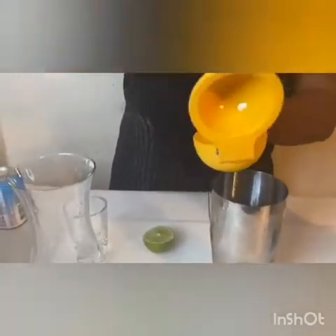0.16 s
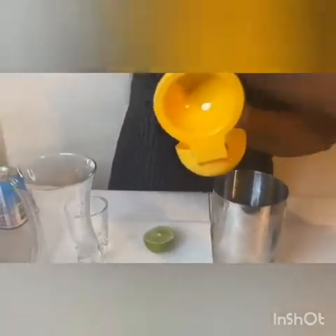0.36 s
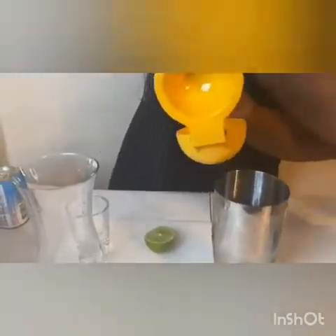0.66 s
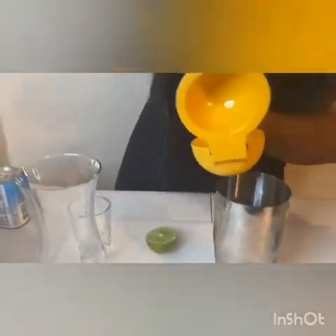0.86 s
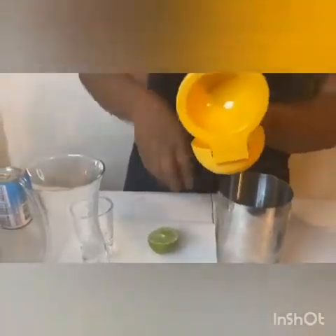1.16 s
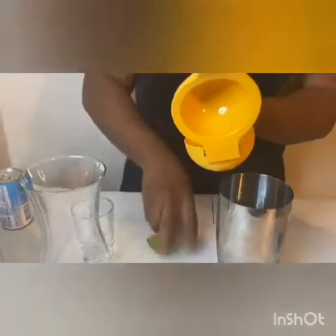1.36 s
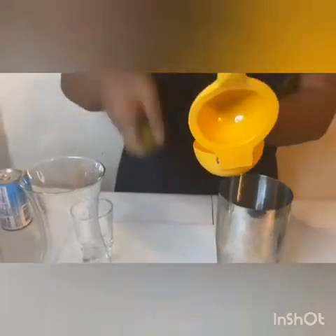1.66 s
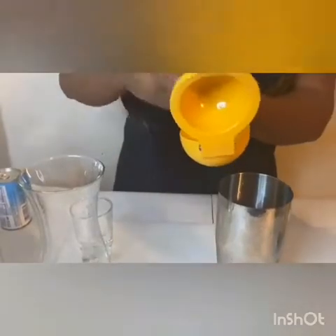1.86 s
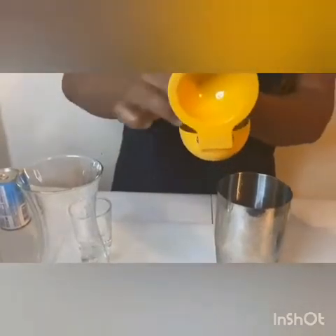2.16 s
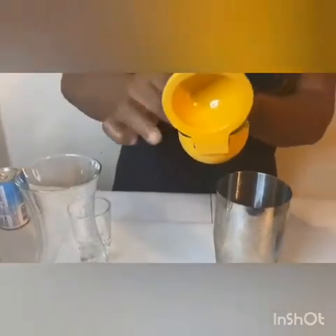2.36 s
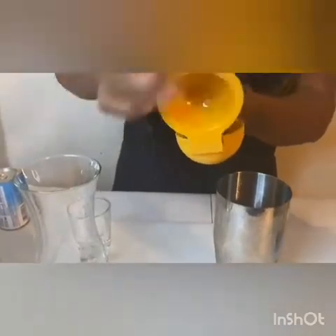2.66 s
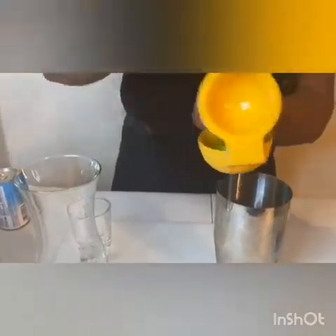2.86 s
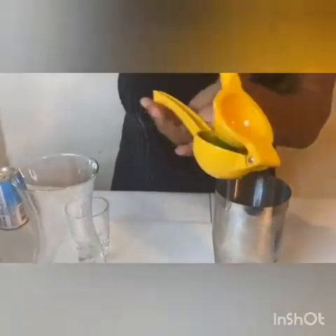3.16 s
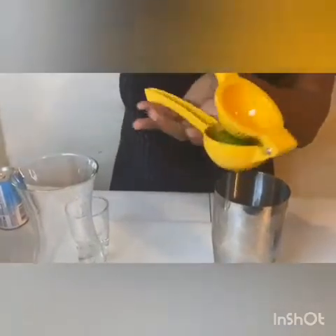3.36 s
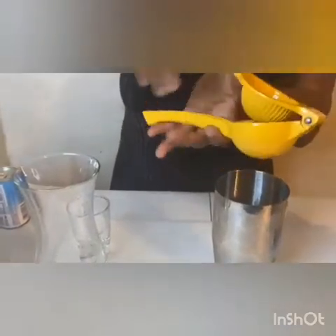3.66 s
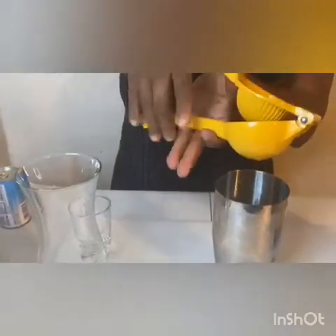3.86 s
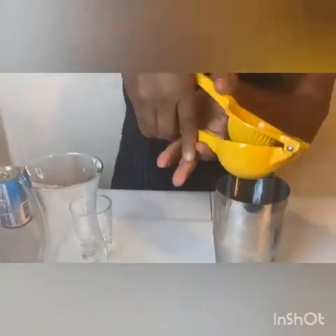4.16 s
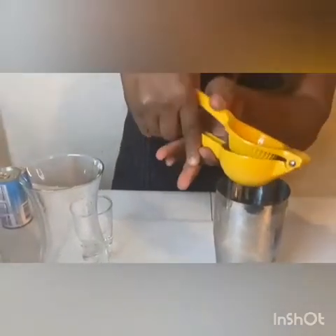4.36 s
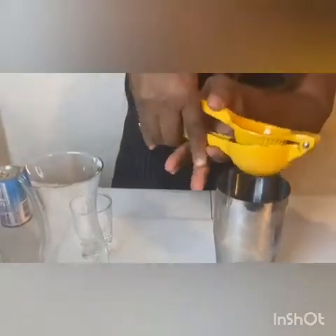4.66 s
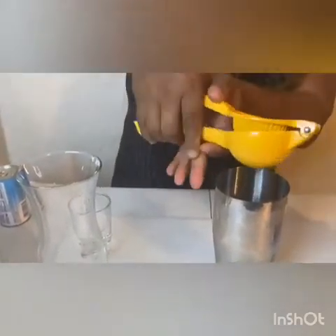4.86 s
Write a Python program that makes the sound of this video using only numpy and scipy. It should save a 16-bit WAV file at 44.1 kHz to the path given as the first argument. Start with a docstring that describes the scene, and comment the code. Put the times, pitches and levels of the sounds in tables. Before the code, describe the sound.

In a small kitchen, soft cloth rustle leads to a loud, low, hollow thump on the counter with a brief rattle. A metal citrus squeezer clacks sharply, a hand brushes a board, then light ticks and clicks follow as half a lime goes in. The hinge creaks and the lime faintly crackles as it is squeezed. Close microphone, low wavering drone and short room reflections.

```python
"""In a small kitchen, a hinged metal citrus squeezer is handled over a steel shaker.
The counter, bumped, booms as a hollow resonator under a dull knock and a rattle. The squeezer's halves clack
and tick as damped modes struck by brief contacts as half a lime goes in; hinge, palm and rind rub by stick-slip,
and the lime crackles as it is crushed. A hand brushes a board and clothes rustle: shaped noise. A low
appliance drone wavers below, with a faint hum and room air; close walls add dense reflections."""
import sys
import numpy as np
from scipy import signal
from scipy.fft import rfft, irfft, next_fast_len
from scipy.io import wavfile

SR = 44100
rng = np.random.default_rng(int(sys.argv[2]) if len(sys.argv) > 2 else 0)


def to_wav(sig):
    """Store sig (one row per channel, or 1-D mono) as 16-bit WAV at the path in sys.argv[1].

    Samples outside -1..1 are clipped; the rate is SR.
    """
    pcm = np.clip(np.atleast_2d(sig), -1, 1) * 32767
    pcm = np.round(pcm).astype(np.int16)
    wavfile.write(sys.argv[1], SR, pcm.T)  # frames by channels


N = 221765
TIME = np.arange(N) / SR
RING_TIME = TIME[:SR // 2]

# metal touching metal: (time [s], level [dB], brightness [dB per octave], ring pitch [Hz],
# contact chatter [s], {part near the blow: extra level [dB]})
TOUCHES = [(.564, -70, -4, 1940, 0.0026, {"cup": 0}),
           (1.104, -44.5, 1.5, 1750, 0.001, {"handle": 3, "cup": 5, "body": 5.5, "ring": 9, "lip": 4.3, "rim": 3.9, "tip": 2.7}),
           (1.1115, -53.5, -6, 1740, 0.00059, {"cup": -5.5, "ring": 4.2, "lip": 2.3}),
           (1.1448, -50, 0.5, 1874, 0.006, {"cup": -1.5, "body": 8.1, "ring": -1.8, "lip": 2.8}),
           (2.1859, -72, 3.5, 2070, 0.0035, {"cup": 3}),
           (2.1997, -69.5, -1, 2250, 0.0085, {"body": 9.6, "ring": 7}),
           (2.2655, -60, 3.5, 1930, 0.0079, {"handle": 13, "body": 2, "ring": 7.9, "rim": 9.7, "tip": -15}),
           (2.2835, -53.5, 2.5, 1886, 0.0018, {"handle": 11.6, "cup": 2.6, "body": 1.8, "ring": 3.3, "rim": 3.6, "tick": 4.8, "tip": -17}),
           (2.2885, -65, -1, 1830, 0.003, {"cup": 6.9, "body": 2, "tick": 23.7, "tip": -13}),
           (2.3737, -63, 0.5, 1905, 0.0027, {"cup": -10.5, "body": -7, "ring": 6.6, "lip": -2, "edge": 3.9, "rim": 9, "tick": -11, "tip": -12}),
           (2.7422, -53, -0.5, 1945, 0.00089, {"cup": -2, "ring": 7.6, "lip": -1, "rim": 3.9, "tip": 7.8}),
           (2.7475, -60.5, -1, 1880, 0.001, {"body": 9.3}),
           (2.8025, -72, -3, 2030, 0.003, {"body": 12, "ring": 9.4}),
           (2.8205, -73.5, 2, 1950, 0.00081, {"ring": 9.4, "rim": 5.9}),
           (2.8255, -71, -0.5, 1667, 0.00039, {"cup": -15, "body": 8.2, "ring": 11}),
           (2.8632, -73.5, -6.5, 1920, 0.0028, {"cup": -10, "ring": 7.5}),
           (2.9718, -47.5, -1, 1771, 0.0014, {"cup": -4.5, "ring": 10.4, "lip": 7.4, "edge": 1.4, "tick": -20, "tip": 12.8}),
           (3.1536, -59, 6, 1822, 0.0014, {"ring": 11.6, "lip": -5, "edge": -4.5, "tick": 6.1, "tip": 1.3}),
           (3.374, -75.5, 5.5, 1885, 0.0014, {"ring": 12.7, "lip": -21, "edge": -7.5, "tick": 4.9}),
           (3.777, -85, 0.5, 1875, 0.0015, {"ring": 15, "edge": 11.6}),
           (4.073, -82.5, -6, 2000, 0.0022, {"lip": 17, "edge": 4.9}),
           (4.259, -56.5, 0.5, 2023, 0.0019, {"cup": 2.6, "ring": 11.8, "lip": 11, "edge": 18.3, "rim": 1, "tick": 5, "tip": 15}),
           (4.3336, -69, 5, 1970, 0.0083, {"body": 15.6}),
           (4.4846, -56.5, 0.5, 2090, 0.0028, {"cup": 13.5, "body": 2.4, "ring": 2.2}),
           (4.6895, -78, -1, 1990, 0.0019, {"lip": 21, "edge": 5.3, "rim": 5.6})]

RUB_ATTACK_S, RUB_T60_S = 0.019, 0.32   # every stroke of hinge, rind and pulp


def from_db(db):
    """Logarithmic level: decibels to amplitude gain."""
    return 10 ** (np.asarray(db) / 20)


def rms_one(x):
    """Power normalisation: scale to unit rms."""
    return x / np.sqrt(np.mean(x ** 2) + 1e-20)


def strike_one(x):
    """Energy normalisation: scale a hit to the energy of 10 ms at unit rms."""
    return x / np.sqrt(np.sum(x ** 2) / (SR / 100) + 1e-20)


def in_time(rows):
    """Linear interpolation: one curve in time for each column of a table."""
    s, *columns = np.transpose(rows)
    return [np.interp(TIME, s, c) for c in columns]


def at_hz(points, size):
    """Spectral interpolation: a table read at the bins of a transform, on a log-frequency axis."""
    hz, value = np.transpose(points)
    return np.interp(np.log(np.fft.rfftfreq(size, 1 / SR) + 1), np.log(hz), value)


def colour(x, spectrum):
    """Linear filtering: weight the transform of a noise by a spectrum."""
    size = next_fast_len(x.shape[-1])
    shaped = irfft(rfft(x, size) * from_db(at_hz(spectrum, size)), size)
    return shaped[..., :x.shape[-1]]


def diffuse(spectrum, size):
    """Diffuse field: stereo noise whose left-right correlation depends on frequency."""
    # likeness of the two sides: (frequency [Hz], correlation [1])
    likeness = [(50, 1), (150, 0.92), (300, 0.77), (600, 0.4), (1200, 0), (2000, 0.27), (3200, 1),
                (5000, 0.73), (7500, -0.029)]
    padded = next_fast_len(size)
    mid, side = rfft(rng.standard_normal((2, padded)))
    alike = np.clip(at_hz(likeness, padded), -1, 1)
    pair = np.sqrt(1 + alike) * mid + np.sqrt(1 - alike) * side * [[1], [-1]]
    return rms_one(irfft(pair * from_db(at_hz(spectrum, padded)), padded)[:, :size])


def drift(hz):
    """Low-pass random process: noise below a cutoff [Hz], with unit rms."""
    slow = signal.sosfilt(signal.butter(2, hz, fs=SR, output="sos"), rng.standard_normal(N + SR))
    return rms_one(slow[SR:])   # the filter has settled after one second


def fade(t60):
    """Exponential damping: decay by 60 dB in t60 [s]."""
    return np.exp(-np.log(1000) * RING_TIME / max(t60, 1e-4))


def ring(modes, spread_db, detune=0):
    """Modal superposition: damped sines whose strength and pitch vary with the blow and the grip."""
    chance = rng.standard_normal((len(modes), 2))
    total = 0
    for k, ((hz, db, t60), (stronger, higher)) in enumerate(zip(modes, chance)):
        gain = (-1) ** k * from_db(db + spread_db * stronger)
        total = total + gain * fade(t60) * np.sin(2 * np.pi * hz * (1 + detune * higher) * RING_TIME)
    return total


def band(x, modes, margin):
    """Band-pass filtering: keep the range of a family of modes, widened by a frequency ratio."""
    low = modes[0][0] / max(margin, 1)
    high = min(modes[-1][0] * max(margin, 1), SR / 2 - 1000)
    return signal.sosfilt(signal.butter(3, [low, high], "band", fs=SR, output="sos"), x + 1e-18)


def add(track, s, sound):
    """Superposition: mix a sound in at a time [s]."""
    start = round(s * SR)
    track[start:start + len(sound)] += sound[:N - start]


def slips(per_s, grain_db, uneven_db, uneven_hz=35):
    """Stick-slip friction: random clicks of either sign whose sizes also drift together."""
    sizes = from_db(grain_db * np.minimum(rng.exponential(1, N), 4) + uneven_db * drift(uneven_hz))
    return (rng.random(N) < per_s / SR) * rng.choice([-1, 1], N) * sizes


def resonate(x, hz, width_hz):
    """Heterodyning: a resonance with a movable centre; shift down, smooth, shift back."""
    turn = np.exp(2j * np.pi * np.cumsum(hz * np.ones(N)) / SR)
    smooth = signal.sosfilt(signal.butter(2, width_hz / 2, fs=SR, output="sos"), x / turn + 1e-18)
    return rms_one(np.real(turn * smooth))


def strokes(rows, attack_s, t60):
    """Amplitude envelope: each movement swells exponentially, holds for its length and dies away."""
    gain = np.zeros(N)
    for s, length, db in rows:
        rise = np.exp(np.minimum(TIME - s, 0) / max(attack_s, .01))
        fall = np.exp(-np.log(1000) * np.maximum(TIME - s - length, 0) / max(t60, .06))
        gain = np.maximum(gain, from_db(db) * rise * fall)
    return gain


def two_tone(rows, main, second, attack_s, t60):
    """Parallel resonances: strokes stir two; the last column sets the second against the first."""
    main_rows = [(s, length, db) for s, length, db, _ in rows]
    second_rows = [(s, length, db + rel_db) for s, length, db, rel_db in rows]
    return main * strokes(main_rows, attack_s, t60) + second * strokes(second_rows, attack_s, t60)


def flurries(rows, grains, t60):
    """Damped excitation: each row (time [s], level [dB]) lets loose a dying run of grains."""
    out = np.zeros(N)
    for s, db in rows:
        run = np.roll(grains, -round(s * SR))[:len(RING_TIME)]
        add(out, s, from_db(db) * strike_one(run * fade(t60)))
    return out


def clacks(crack_lengths=8.5, chatter=0.066, shorter_per_octave=0.5):
    """Impact excitation: a click with chatter drives the modes, with a noisy crack, most where struck."""
    # the squeezer's modes, damped by the hands: {family: (frequency [Hz], level [dB], t60 [s])}
    squeezer_modes = { "handle": [(342, -6, 0.03), (400, -6, 0.033), (445.3, 1, 0.089)],
                      "cup": [(620, -17, 0.025), (695, 0, 0.1), (740, -14, 0.03)],
                      "body": [(1056, -5.5, 0.022), (1260, -2.5, 0.0082), (1470, -0.5, 0.02),
                      (1524, -5.5, 0.019)], "ring": [(1680, -8, 0.018), (1885, 2.5, 0.019),
                      (2028, -8.5, 0.037), (2144, -5.5, 0.0072)], "lip": [(2268, 3.5, 0.023),
                      (2586, -5.5, 0.039), (2744, -0.5, 0.018)], "edge": [(2940, 0.5, 0.05),
                      (3174, -2.5, 0.047), (3297, -4, 0.029), (3470, 4, 0.055)],
                      "rim": [(4300, -3.5, 0.036), (4800, 4, 0.024), (5070, -5, 0.047), (5310, -4, 0.036),
                      (5220, -4.5, 0.056)], "tick": [(5970, -1, 0.022), (6460, -2.5, 0.04),
                      (6700, -2, 0.029), (6760, -6.5, .04)], "tip": [(7330, 4.5, 0.02), (7610, -7.5, 0.058),
                      (8300, -14.5, 0.005), (10900, -5.5, 0.031)]}
    # how strongly each part answers any touch: {family: level [dB]}
    part_db = {"handle": -12.5, "cup": 2, "body": -4, "ring": 1.5, "lip": -7, "edge": -3, "rim": -11.5,
               "tick": -19.5, "tip": -29.5}
    # the noisy crack against each family's tone: {family: level [dB]}
    crack_db = {"handle": -3.5, "cup": -4, "body": 0.5, "ring": -8, "lip": -1.5, "edge": -1.5, "rim": -1,
                "tick": -0.5, "tip": -7}
    # modes that sing on when the open half hangs free: (frequency [Hz], level re blow [dB], t60 [s])
    sing_modes = [(1740, -13, .22), (1890, -16, .42), (1980, -15, .28)]
    ring_hz = 1885   # the ring family's usual pitch; the grip shifts it
    free_from_s, free_until_s = 2.9, 3.5   # the open half hangs free
    out, singing = np.zeros((2, N))
    for s, level_db, bright_db, pitch_hz, chatter_s, struck_db in TOUCHES:
        contact = chatter * rng.standard_normal(1024) * np.exp(-TIME[:1024] / max(chatter_s, 1e-4))
        contact[0] += 1
        for family, modes in squeezer_modes.items():
            octaves = np.mean([np.log2(hz / ring_hz) for hz, _, _ in modes])
            db = level_db + part_db[family] + bright_db * octaves + struck_db.get(family, 0)
            if family == "ring":
                modes = [(hz * pitch_hz / ring_hz, level, t60) for hz, level, t60 in modes]
            # brief contacts and high parts crack briefly
            crack_t60 = crack_lengths * chatter_s / 2 ** (shorter_per_octave * octaves)
            burst = rng.standard_normal(len(RING_TIME)) * fade(crack_t60)
            crack_modes = [m for m in modes if m[0] < 8000]   # Hz
            crack = from_db(crack_db[family]) * strike_one(band(burst, crack_modes, margin=1.035))
            tone = band(ring(modes, spread_db=5.0, detune=0.008), modes, margin=1.15)
            tone = strike_one(signal.fftconvolve(tone, contact)[:len(crack)])
            add(out, s - .0005, from_db(db) * strike_one(tone + crack))
        if free_from_s < s < free_until_s:
            add(singing, s, from_db(level_db) * ring(sing_modes, spread_db=7.0))
    return out + singing * (1 + .8 * drift(70))   # the singing is unsteady


def loose_pin(buzz_db=-9, t60=0.071):
    """Rattling contact: play in the hinge gives a grainy, dying buzz after each blow."""
    # the pin's buzz: (frequency [Hz], spectral level [dB])
    buzz_spectrum = [(500, -8.5), (1000, -7), (1500, 4), (2400, 6.5), (3400, 1), (4100, -4), (5100, -10.5),
                     (6200, -23.5), (9000, -31.5)]
    grains = colour(slips(per_s=1800, grain_db=3.0, uneven_db=2.5, uneven_hz=120), buzz_spectrum)
    return flurries([(s, db + buzz_db) for s, db, *_ in TOUCHES], grains, t60)


def hinge():
    """Stick-slip excitation: slips in the hinge drive a shifting ring and a higher squeak."""
    # turns: (time at full strength [s], length [s], level [dB], squeak re ring [dB])
    turns = [(.03, 0.021, -77, -10), (.33, 0.0082, -74.5, -9), (3.02, .38, -77.5, -14.5),
             (3.29, 0.011, -70.5, -16), (3.6, 0.031, -83, -8), (3.75, 0.011, -84, -11),
             (4.05, 0.13, -77, 1.5), (4.215, 0.022, -71.5, -1), (4.29, 0.22, -67, -11.5),
             (4.62, 0.093, -80, -8.5)]
    # the ring shifts with the grip and the angle: (time [s], frequency [Hz])
    ring_pitch = [(.1, 1693), (.33, 2234), (3.0, 1950), (3.4, 1784), (3.62, 2026), (4.22, 1984),
                  (4.4, 2084), (4.72, 1977)]
    # the squeak climbs a little as the halves close: (time [s], frequency [Hz])
    squeak_pitch = [(4.05, 2720), (4.17, 2800), (4.25, 2950), (4.5, 3150)]
    # neighbouring resonances of the squeak: (frequency ratio [1], gain [1])
    strands = [(.91, .4), (1, 1), (1.1, .5)]
    friction = slips(per_s=800, grain_db=3.5, uneven_db=2.0, uneven_hz=60)
    groan = resonate(friction, in_time(ring_pitch)[0], width_hz=200)
    squeak_hz = in_time(squeak_pitch)[0]
    squeak = sum(gain * resonate(friction, ratio * squeak_hz, width_hz=200) for ratio, gain in strands)
    return two_tone(turns, groan, rms_one(squeak), RUB_ATTACK_S, RUB_T60_S)


def palm():
    """Frictional excitation: the palm slides on the handle and stirs two resonances of the cup."""
    # slides: (time at full strength [s], length [s], level [dB], low resonance re main [dB])
    slides = [(1.12, 0.33, -72, -4), (3.54, 0.24, -72, 0), (4.28, 0.038, -62, -19), (4.6, 0.3, -82, 3.5)]
    friction = slips(per_s=5500, grain_db=2.0, uneven_db=0.5)
    main = resonate(friction, hz=710, width_hz=90)
    low = resonate(friction, hz=590, width_hz=150)
    return two_tone(slides, main, low, attack_s=0.015, t60=0.7)


def rind():
    """Stick-slip friction: the rind scrapes in the cup as coloured, clumped clicks."""
    # scrapes: (time at full strength [s], length [s], level [dB])
    scrapes = [(2.2, 0.0086, -72.5), (2.287, 0.0041, -61), (2.76, 0.1, -70.5), (2.985, 0.0043, -64),
               (4.27, 0.266, -66), (4.58, 0.11, -80.5)]
    # the scrape: (frequency [Hz], spectral level [dB])
    rind_spectrum = [(150, -1.5), (400, 2.5), (700, 3.5), (1000, -4), (1500, -2), (2100, 0), (2500, -0.5),
                     (3000, -7.5), (3500, -1), (3900, -9), (4400, -9), (5200, -10.5), (7000, -29),
                     (9000, -42)]
    grit = slips(per_s=2800, grain_db=4.2, uneven_db=3.0, uneven_hz=70)
    return strokes(scrapes, RUB_ATTACK_S, RUB_T60_S) * rms_one(colour(grit, rind_spectrum))


def pulp():
    """Granular noise: the pulp fizzes under pressure as many tiny random clicks."""
    # squirts: (time at full strength [s], length [s], level [dB])
    squirts = [(4.26, 0.043, -84), (4.415, 0.14, -83), (4.56, 0.045, -77), (4.65, 0.026, -81)]
    # the fizz: (frequency [Hz], spectral level [dB])
    pulp_spectrum = [(2500, -7), (5000, -7), (6900, 4), (8500, -9), (9500, -15), (11000, -9), (12000, -16)]
    fizz = slips(per_s=3000, grain_db=4.0, uneven_db=3.5, uneven_hz=60)
    return strokes(squirts, RUB_ATTACK_S, RUB_T60_S) * rms_one(colour(fizz, pulp_spectrum))


def crackles(t60=0.035):
    """Impulsive emission: the crushed lime's cells burst in separate short, wet crackles."""
    # bursts: (time [s], level [dB])
    bursts = [(4.3339, -86), (4.3728, -92), (4.4207, -71), (4.4506, -83), (4.4716, -74), (4.5464, -66.5),
              (4.5818, -75), (4.598, -90.5), (4.6497, -74.5), (4.6936, -70.5), (4.706, -79)]
    # the crackle: (frequency [Hz], spectral level [dB])
    burst_spectrum = [(1500, -16), (3000, 3), (5000, 6), (6500, -2), (8000, -8), (10500, -7.5),
                      (12000, -20)]
    grains = colour(slips(per_s=2500, grain_db=4.0, uneven_db=2.0, uneven_hz=200), burst_spectrum)
    return flurries(bursts, grains, t60)


def counter(knock_t60=0.16, rattle_t60=0.1, rise_s=0.0025, spread_db=-0.2):
    """Modal resonance: bumps set the hollow body booming, under a diffuse knock and uneven rattle."""
    # bumps: (time [s], boom level [dB], knock level [dB], rattle level [dB])
    bumps = [(0.6161, -30, -25.5, -46.5), (0.6192, -29, -14, -35.5), (0.628, -14.5, -25.5, -41.5),
             (0.66, -29.5, -41, -50.5), (0.6814, -26.5, -21.5, -49), (0.7192, -36, -18, -41.5),
             (0.732, -23, -29, -55), (0.7955, -34, -20, -47), (0.7995, -26, -18, -51),
             (.808, -23, -20.5, -50)]
    # modes of the hollow counter: (frequency [Hz], level [dB], t60 [s])
    counter_modes = [(144.9, 6, 0.22), (245.6, 2, 0.066), (248.7, -1, 0.16), (297.7, -11.5, 0.21),
                     (349, -20.5, 0.2), (409, -14, 0.28), (447, -24.5, 0.34), (501, -24, 0.2),
                     (574, -25, 0.27), (642, -17, 0.24), (714, -25, 0.25), (890, -29, 0.22),
                     (952, -32.5, 0.14), (1079, -21, 0.093), (1470, -41.5, 0.23)]
    # dull knock: (frequency [Hz], spectral level [dB])
    knock_spectrum = [(40, -29.5), (75, -3), (130, 11), (190, -9), (250, 10.5), (330, 2), (420, 1.5),
                      (520, -4.5), (700, -6), (1100, -19), (1400, -29.5), (2400, -56.5), (5000, -83)]
    # loose things rattle and buzz: (frequency [Hz], spectral level [dB])
    rattle_spectrum = [(600, -13), (1400, 0), (2100, -5), (2600, -11), (3400, -3.5), (4200, -14.5),
                       (5200, -22.5), (7000, -36), (12000, -52)]
    out, size = np.zeros((2, N)), len(RING_TIME)
    swell = 1 - np.exp(-RING_TIME / rise_s)   # a soft contact takes time to build
    snap = 1 - np.exp(-(RING_TIME / .0006) ** 2)
    for s, boom_db, knock_db, rattle_db in bumps:
        jolts = from_db(2.5 * drift(200)[:size])
        knock = strike_one(diffuse(knock_spectrum, size) * snap * fade(knock_t60))
        rattle = strike_one(diffuse(rattle_spectrum, size) * jolts * snap * fade(rattle_t60))
        noise = from_db(knock_db) * knock + from_db(rattle_db) * rattle
        for side in range(2):   # the modes are drawn a little differently on each side
            boom = from_db(boom_db) * swell * ring(counter_modes, spread_db=spread_db)
            add(out[side], s, boom + noise[side])
    return out


def brushing(attack_s=0.03, t60=0.5):
    """Friction noise: a hand brushes over the board, softly and dully, as it reaches for the lime."""
    # brushes: (time at full strength [s], length [s], level [dB])
    brushes = [(.97, 0.13, -67.5), (1.38, 0.078, -59)]
    # the board: (frequency [Hz], spectral level [dB])
    board_spectrum = [(70, -14), (150, 5), (220, 0), (340, -5.5), (450, -8), (600, -9), (1000, -26),
                      (3000, -51.5)]
    return strokes(brushes, attack_s, t60) * diffuse(board_spectrum, N)


def kitchen(x, wet_db, t60, build_s):
    """Reverberation: the direct sound plus dense, decaying reflections from close walls."""
    # the echo: (frequency [Hz], spectral level [dB])
    echo_spectrum = [(100, 3.5), (300, 10.5), (700, -3.5), (1100, -0.5), (2000, -2), (3500, -4),
                     (6000, 1.5), (12000, -3.5)]
    build = 1 - np.exp(-(RING_TIME / build_s) ** 2)
    tail = diffuse(echo_spectrum, len(RING_TIME)) * fade(t60) * build
    tail = tail / np.sqrt(np.sum(tail ** 2) / 2)
    return x + from_db(wet_db) * signal.fftconvolve(np.atleast_2d(x), tail, axes=1)[:, :N]


def clothes(rest_db=-85, folds_db=3.0, folds_hz=14):
    """Friction noise: arm movements rustle the clothes, unevenly, above a faint resting level."""
    # movements: (time at full strength [s], length [s], level [dB])
    movements = [(0, 0.0065, -74.5), (.43, 0.19, -62.5), (.65, 0.091, -52), (1.02, 0.12, -63),
                 (1.43, 0.11, -69), (1.62, 0.2, -74), (2.08, 0.0061, -69.5)]
    # the cloth: (frequency [Hz], spectral level [dB])
    cloth_spectrum = [(150, 6), (400, 10.5), (720, 9), (1050, 5), (1700, 5), (3300, -5.5), (5000, -13),
                      (7000, -22), (11000, -56.5)]
    moving = np.maximum(strokes(movements, attack_s=0.069, t60=0.9), from_db(rest_db))
    return moving * from_db(folds_db * drift(folds_hz)) * diffuse(cloth_spectrum, N)


def appliance_drone(drone_hz=50.9, level_db=-47, waver=.36, waver_hz=5):
    """Quadrature modulation: slow noise on sine and cosine makes a low tone waver; it sinks for a while."""
    dip_s, dip_width_s, dip_db = 1.79, 0.91, 13.5
    turn = 2 * np.pi * drone_hz * TIME
    wavering = waver * (drift(waver_hz) * np.sin(turn) + drift(waver_hz) * np.cos(turn))
    sink_db = dip_db * np.exp(-((TIME - dip_s) / dip_width_s) ** 2)
    return from_db(level_db - sink_db) * rms_one(np.sin(turn) + wavering)


def faint_hum():
    """Pure tone: a steady sine swells in under an envelope."""
    # entries: (time at full strength [s], length [s], level [dB])
    entries = [(4.7, 0.23, -63)]
    return strokes(entries, attack_s=0.067, t60=0.38) * rms_one(np.sin(2 * np.pi * 153 * TIME))   # Hz


def room_air(level_db=-55.5):
    """Diffuse field: steady coloured noise, high-passed at 60 Hz."""
    # the air: (frequency [Hz], spectral level [dB])
    air_spectrum = [(25, -28.5), (60, 2.5), (95, -9.5), (155, -15), (250, -21), (360, -26.5), (500, -31),
                    (720, -40.5), (1000, -50.5), (2000, -52.5), (4000, -57.5), (7500, -60), (12000, -71.5)]
    high_pass = signal.butter(2, 60, "high", fs=SR, output="sos")
    return from_db(level_db) * rms_one(signal.sosfilt(high_pass, diffuse(air_spectrum, N)))


def scene():
    """Superposition: the thump lies a little to the right and lingers; the squeezer is straight ahead."""
    handling = clacks() + loose_pin() + hinge() + palm() + rind() + pulp() + crackles()
    squeezer = kitchen(handling, wet_db=-7.0, t60=0.22, build_s=0.0005)
    to_right = from_db(0.54 * np.array([[-1], [1]]))
    thump = kitchen(counter() * to_right, wet_db=-32, t60=0.62, build_s=0.0071)
    background = clothes() + appliance_drone() + faint_hum() + room_air()
    return squeezer + thump + brushing() + background


def record(dry):
    """Band limitation: an elliptic low-pass cuts the top steeply at 12150 Hz."""
    return signal.sosfilt(signal.ellip(10, .1, 80, 12150, fs=SR, output="sos"), dry)


dry = scene()
out = record(dry)
to_wav(out)
```